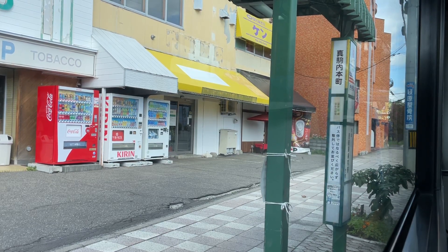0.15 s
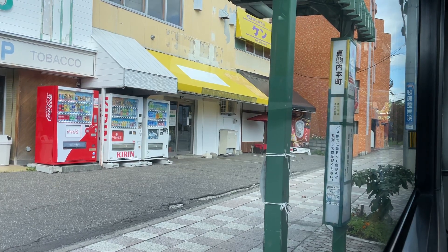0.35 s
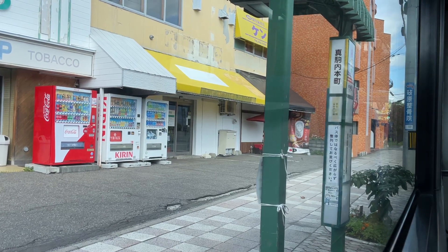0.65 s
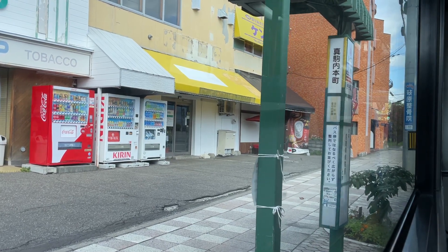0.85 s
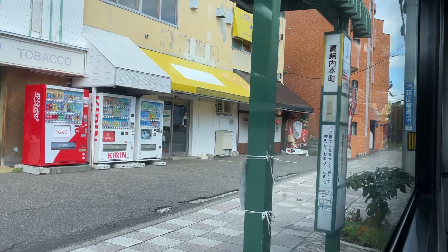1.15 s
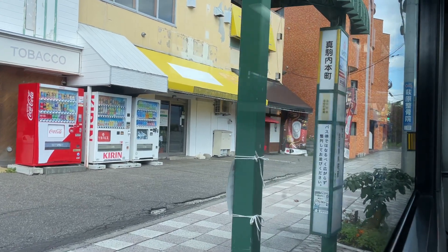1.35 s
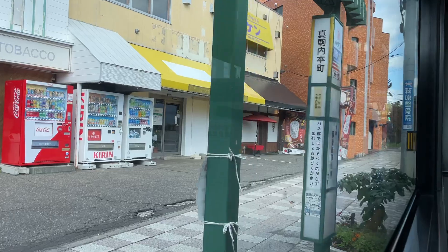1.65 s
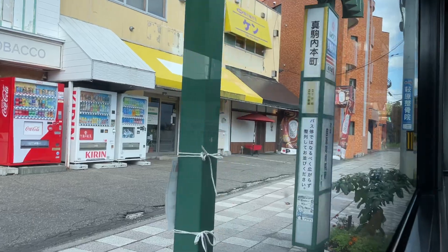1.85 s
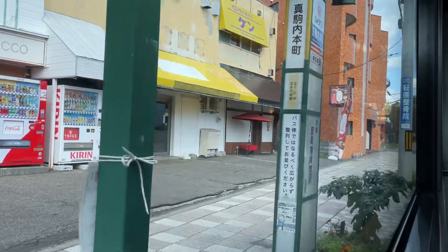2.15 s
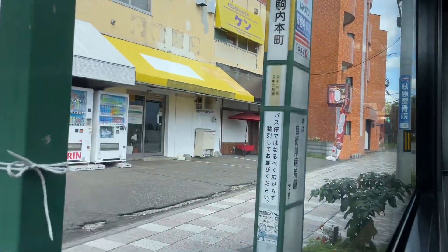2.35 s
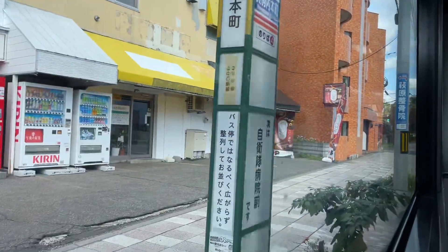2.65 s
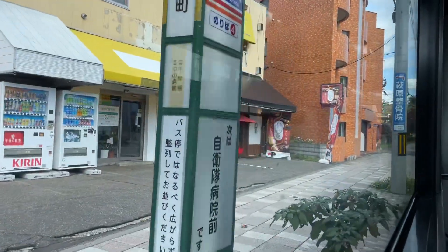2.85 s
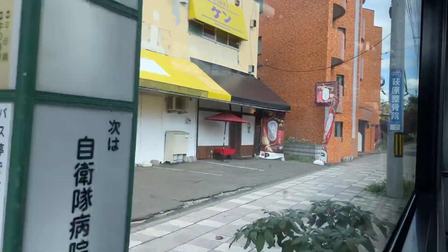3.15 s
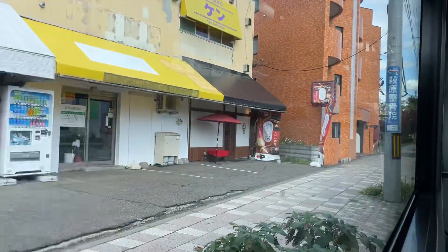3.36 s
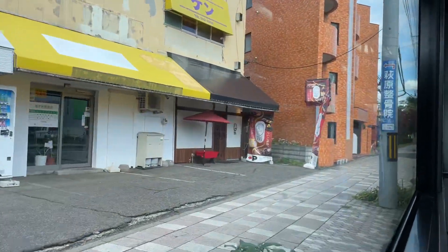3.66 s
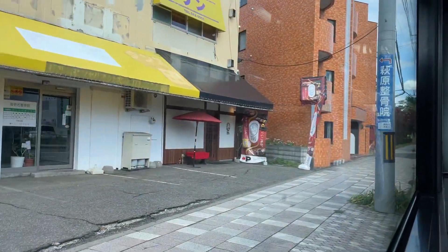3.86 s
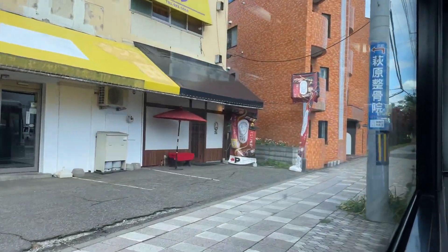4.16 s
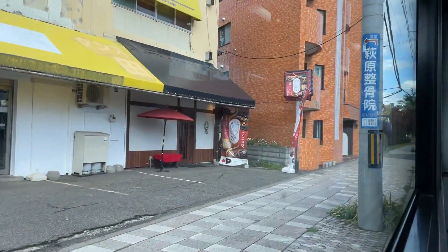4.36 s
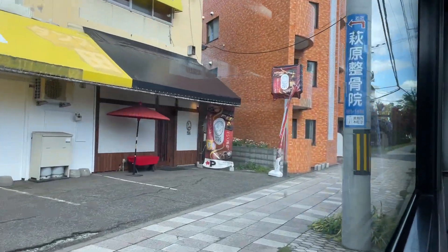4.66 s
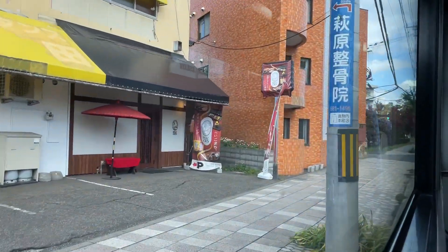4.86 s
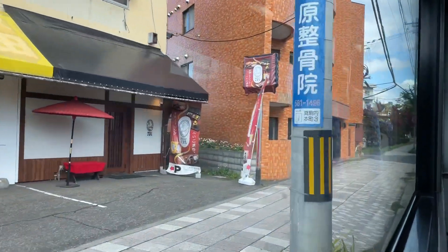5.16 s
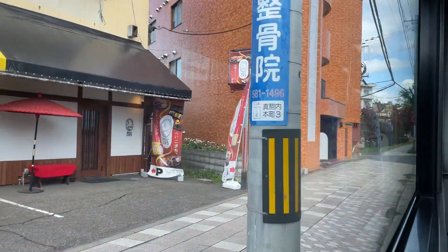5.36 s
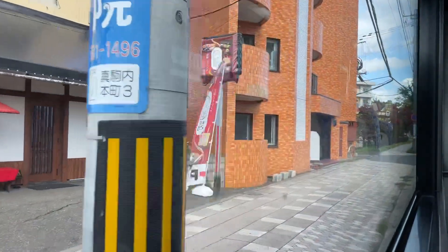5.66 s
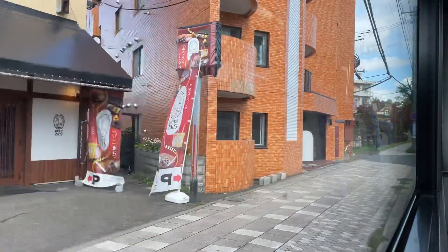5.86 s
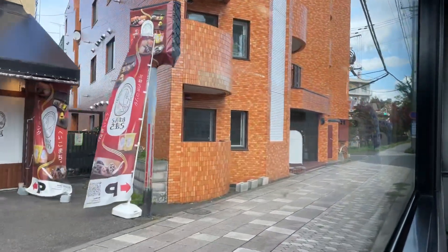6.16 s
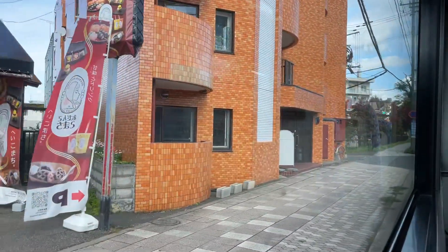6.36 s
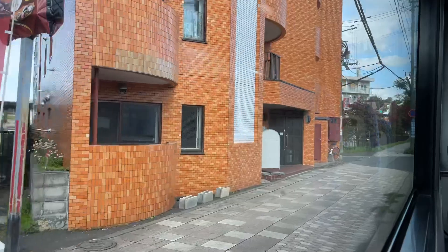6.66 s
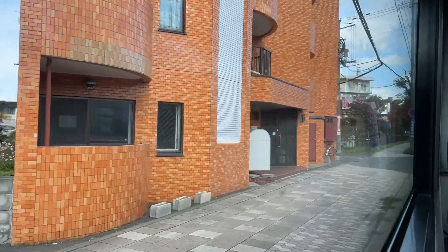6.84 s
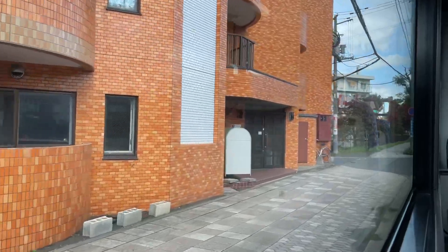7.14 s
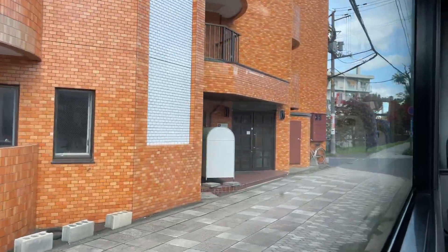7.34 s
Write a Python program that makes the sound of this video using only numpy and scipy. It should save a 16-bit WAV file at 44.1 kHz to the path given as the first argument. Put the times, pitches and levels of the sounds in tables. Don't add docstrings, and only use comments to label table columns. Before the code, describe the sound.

Inside a city bus, a diesel engine sinks to a rumbling idle, then pulls away and revs up hard before dropping for a gear change.

```python
import sys
import numpy as np
from scipy import signal
from scipy.fft import rfft, irfft
from scipy.io import wavfile
from scipy.ndimage import uniform_filter1d, map_coordinates

SR = 44100
rng = np.random.default_rng(int(sys.argv[2]) if len(sys.argv) > 2 else 0)


def gain_from_db(level_db):
    decades = np.asarray(level_db, float) / 20
    return 10 ** decades


def inscribe(sig):
    pcm = np.round(np.clip(np.atleast_2d(sig).T, -1, 1) * 32767)
    wavfile.write(sys.argv[1], SR, pcm.astype(np.int16))


N = 330750
TONE_DECIMATION = 8


def evened(x):
    return x / np.sqrt(np.mean(x ** 2) + 1e-20)


def read_spectrum(points, hz, column=1):
    table = np.transpose(points)
    return np.interp(np.log(hz + 1), np.log(table[0] + 1), table[column])


def curves(rows, t):
    s, *columns = np.transpose(rows)
    return [np.interp(t, s, column) for column in columns]


def drift(t, rate_hz):
    return map_coordinates(rng.standard_normal(400), [t * rate_hz], order=3, mode="wrap")


def peaks_db(rows, hz):
    return sum(db / (1 + (2 * (hz - centre_hz) / width_hz) ** 2) for centre_hz, width_hz, db in rows)


def resonate(x, hz, width_hz):
    turn = np.exp(2j * np.pi * hz * np.arange(len(x)) / SR)
    r = np.exp(-np.pi * width_hz / SR)
    return 2 * (turn * signal.lfilter([1 - r], [1, -r], x / turn)).real


def add(mix, start_s, sound):
    part = mix[round(start_s * SR):][:len(sound)]
    part += sound[:len(part)]


# time_s, firing_hz, load_db
ENGINE = [(0, 46.26, -33), (.4, 37.7, -37), (.8, 27.8, -36.5), (1.2, 25.05, -37.5), (1.7, 27, -36),
          (2.2, 36.09, -35.5), (3, 52.44, -33.5), (4.2, 78.96, -31), (4.7, 90.32, -25.5),
          (5.2, 99.24, -25.5), (5.45, 103.3, -25), (5.65, 105.4, -26.5), (5.95, 100.4, -29),
          (6.45, 92.62, -30.5), (6.7, 86.3, -33.5), (6.95, 77.95, -33.5), (7.2, 67.7, -32.5),
          (7.5, 58.66, -33.5)]
# pulling_db, coasting_db
UNEVEN_DB = [(-5, -9.5), (-1.5, -0.5), (-2.5, -6), (4, 2), (-42, -45), (-3, 4), (-12, 1.5), (-39.5, -43.5),
             (-3, 0), (0.5, 5.5), (-40.5, -38.5), (-2.5, -19), (-4, 4.5), (-5, -4.5), (-3.5, -2.5),
             (-6.5, -15), (-8, -8.5), (-5.5, -10), (-17.5, -6), (-3.5, -3.5), (-3.5, -5), (-9, -7),
             (-16.5, -4.5), (-12.5, -12.5), (-6, -16), (-6, -9.5), (-4, -6.5)]
# frequency_hz, level_db
CABIN = [(30, -12.5), (55, -2.5), (80, 2.5), (160, 1), (270, -4), (380, -1.5), (490, -7), (600, -5)]
# cycle_multiple, pulling_db, coasting_db, slope_db per octave of engine speed
BOOMS = [
    (6, -33, -42, -2),
    (9, -36, -33.5, 10),
    (12, -38, -39, 5),
]
# centre_hz, width_hz, level_db
BODY_MODES = [(35, 7, 11), (43, 5, -9), (53, 9, 18), (67, 4, 13), (78, 8, 19), (88, 6, -5), (98, 8, 14),
              (106, 5, -8), (116, 10, 15), (128, 7, 13), (140, 7, -5), (153, 20, 10.5), (170, 8, 3),
              (210, 14, 10)]
PULL_S, LIFT_S = 1.64, 5.85
BOOM_PER_LOAD = .5


def engine(t):
    firing_hz, load_db = curves(ENGINE, t)
    cycle_hz = firing_hz / 6
    cycle = np.cumsum(firing_hz * (1 + .002 * drift(t, 6))) / 6 * t[1]
    lifted = np.clip((t - LIFT_S) / 0.28, 0, 1)
    idling = np.clip((PULL_S - t) / 0.26, 0, 1)
    out = np.zeros((2, len(t)))
    for order, (pull_db, coast_db) in enumerate(UNEVEN_DB, 2):
        hz = order * cycle_hz
        db = pull_db + lifted * (coast_db - pull_db)
        level = gain_from_db(load_db + db + read_spectrum(CABIN, hz) + 2.8 * drift(t, 4))
        phase = 2 * np.pi * (order * cycle + rng.random() + .02 * drift(t, 4))
        side = np.interp(hz, [290, 380], [.2, .9])
        lag = np.interp(hz, [60, 300], [1.7, .8])
        out += level * [np.sin(phase), side * np.sin(phase - lag)]
    for order, pull_db, coast_db, octave_db in BOOMS:
        hz = order * cycle_hz
        db = pull_db + np.maximum(lifted, idling) * (coast_db - pull_db)
        db = db + BOOM_PER_LOAD * (load_db + 33) + octave_db * np.log2(firing_hz / 70)
        db = db + peaks_db(BODY_MODES, hz)
        phase = 2 * np.pi * (order * cycle + rng.random())
        lag = np.interp(hz, [60, 160], [1.8, 1.1])
        out += np.sqrt(2) * gain_from_db(db - 1.5) * [np.sin(phase), .2 * np.sin(phase - lag)]
    return out


def tone(t, hz, side, waver_db):
    wave = np.sin(2 * np.pi * (np.cumsum(hz) * t[1] + .03 * drift(t, 6)))
    return np.sqrt(2) * gain_from_db(waver_db * drift(t, 8)) * wave * [[1], [side]]


def glide(row, t, side, waver_db):
    start_s, end_s, first_hz, last_hz, db = row
    u = np.clip((t - start_s) / (end_s - start_s), 0, 1)
    swell = (4 * u * (1 - u)) ** .6
    return gain_from_db(db) * swell * tone(t, first_hz + u * (last_hz - first_hz), side, waver_db)


# start_s, end_s, first_hz, last_hz, level_db
WHINES = [(2.25, 2.75, 193, 226, -32), (3.0, 3.65, 246, 301, -29), (3.75, 4.3, 375, 425, -33),
          (4.95, 5.55, 482, 530, -35), (4.7, 5.85, 565, 570, -35), (5.85, 6.75, 405, 383, -30),
          (6.85, 8.0, 330, 364, -26), (6.95, 8.0, 462, 522, -35), (5.2, 5.85, 478, 496, -31),
          (4.3, 5.9, 378, 386, -31), (1.9, 2.45, 250, 300, -37), (1.4, 3.6, 165, 158, -30),
          (6.3, 6.8, 224, 203, -27)]


def whines(t):
    out = np.zeros((2, len(t)))
    for row in WHINES:
        side = np.interp(row[2], [200, 330, 570], [.15, .8, 1.1])
        out += glide(row, t, side, waver_db=1.5)
    return out


# frequency_hz, in_step, quarter_turn_early
LINK = [(40, -.2, .4), (90, 0, .4), (160, .4, .4), (300, .6, .6), (450, 1, .65), (700, .55, .5),
        (1100, 0.56, .2), (1800, .15, -.3), (3000, .15, .2), (5000, .4, 0), (9000, 0.095, 0)]
# centre_hz, width_hz, level_db
RIDGES = [(751, 6.1, 6.5), (1143, 17, 6.5), (1248, 23, 6), (1494, 40, 6.5), (2383, 110, 5.5),
          (3400, 140, 2.5), (5200, 180, 6.5), (10100, 130, 6.5), (11700, 200, -0.5)]


def noise(mid, side, size, patchy_db, level_db):
    hop, hz = size // 4, np.fft.rfftfreq(size, 1 / SR)
    frames = N // hop + 5
    a, b, c, d, patches = rng.standard_normal((frames, len(hz), 5)).T
    patches = uniform_filter1d(patches, size=10, axis=0)
    patches = evened(uniform_filter1d(patches, size=6, axis=1))
    link = (read_spectrum(LINK, hz) + 1j * read_spectrum(LINK, hz, column=2))[:, None]
    link = link / np.maximum(abs(link), .95) * 0.76
    shared, apart = a + 1j * b, c + 1j * d
    z = np.array([shared, link * shared + np.sqrt(1 - abs(link) ** 2) * apart])
    spectra_db = np.array([read_spectrum(mid, hz), read_spectrum(side, hz)])
    colour = gain_from_db(spectra_db + peaks_db(RIDGES, hz))[:, :, None]
    z *= colour / np.sqrt((colour ** 2).sum(1, keepdims=True))
    z *= gain_from_db(patchy_db * patches + level_db(hz[:, None], np.arange(frames) * hop / SR))
    return signal.istft(z, nperseg=size, noverlap=size - hop)[1][:, :N]


# frequency_hz, density_db per Hz
RUMBLE_MID = [(12, -36.5), (20, -23), (53, -4), (89, -1), (130, -9), (161, 2), (188, -7), (279, -13),
              (308, -13.5), (367, -9.5), (484, -20), (523, -24), (908, -27.5), (1150, -30), (2200, -47),
              (2860, -85), (4840, -120)]
RUMBLE_SIDE = [(12, -43.5), (20, -17.5), (48, -3), (106, -4.5), (135, -3.5), (263, -12.5), (382, -3),
               (474, -1), (523, -13.5), (625, -6.5), (908, -23), (982, -16), (1040, -23.5), (1430, -23),
               (2200, -49), (2860, -70.5), (4840, -120)]
# rest_db, load_share in dB per dB, road_db gained at road speed
SHAKING = [
    (-4, -0.03, 5.5),
    (-3, -0.02, 6),
    (-4, 0.32, 10),
    (-2, 0.635, 1.5),
]
# time_s,
# level_db
BUMPS = [(.21, 2.5), (1.29, 7.5), (1.98, 11.5), (3.13, 9), (3.7, 0.5), (4.26, 7), (4.75, 6.5), (5.08, 2.5),
         (5.68, 6.5), (5.9, 2.5), (6.5, 4.5)]
ROLL_S, UP_TO_SPEED_S, BUMP_S = 0.81, 3.18, .16


def rumble():
    def level_db(hz, t):
        load_db = curves(ENGINE, t)[1] + 36
        road = np.clip((t - ROLL_S) / UP_TO_SPEED_S, 0, 1)
        heave, shake, drone, roar = (rest_db + share * load_db + road_db * road
                                     for rest_db, share, road_db in SHAKING)
        heave = heave + sum(db * np.exp(-((t - s) / BUMP_S) ** 2) for s, db in BUMPS)
        low, upper, top = (np.clip((hz - edge_hz) / (.4 * edge_hz), 0, 1) for edge_hz in (75, 260, 600))
        fade = np.clip(1 - (hz - 1400) / 1500, 0, 1)
        body = (1 - low) * heave + low * (1 - upper) * shake
        return body + upper * (1 - top) * drone + top * fade * roar
    sound = noise(RUMBLE_MID, RUMBLE_SIDE, size=2048, patchy_db=1.5, level_db=level_db)
    return gain_from_db(-22) * sound * gain_from_db([[0], [-9]])


# frequency_hz, density_db per Hz
HISS_MID = [(1060, -23.5), (1800, -2), (2090, -8), (2700, -1), (2930, -7.5), (3440, -9.5), (4400, -13),
            (6110, -14), (6760, -25), (7230, -55), (7930, -35), (8780, -27.5), (12700, -27), (14300, -54)]
HISS_SIDE = [(1060, -28), (1800, 3), (2040, -15), (2540, -8.5), (3720, -14), (4740, -19), (5810, -19),
             (6820, -12), (9310, -28), (10500, -59), (11700, -54.5), (12600, -36), (15700, -32.5),
             (16100, -75)]


def through_ports(x, side_db):
    hz = np.fft.rfftfreq(N, 1 / SR)
    open_hz = np.maximum(hz, 3200)
    mid_gain_db = read_spectrum(HISS_MID, open_hz) - read_spectrum(HISS_MID, 3200)
    side_gain_db = read_spectrum(HISS_SIDE, open_hz) - read_spectrum(HISS_SIDE, 3200) + side_db
    tilt_db = 6.26 * np.log2(open_hz / 3200)
    return irfft(rfft(x) * gain_from_db(np.array([mid_gain_db, side_gain_db]) + tilt_db), N)


# start_s, peak_db, ring_hz, ring_width_hz, snap_db
TICKS = [(1.04, -47, 3340, 700, -54.5), (1.283, -39, 3330, 500, -43), (1.8657, -36.5, 1397, 1480, -42),
         (2.012, -48, 3175, 502, -52.5), (2.379, -56.5, 5000, 1500, -54), (2.4136, -34, 1300, 1200, -49.5),
         (2.44, -52, 5000, 1500, -53), (2.529, -29, 4740, 3920, -31.5), (2.526, -30.5, 1180, 1500, -51.5),
         (2.87, -44.5, 3676, 1199, -52.5), (3.2609, -46, 3188, 795, -49.5), (3.8252, -42, 3400, 900, -50.5),
         (4.754, -35, 4000, 3000, -42.5), (4.772, -40.5, 2504, 1500, -54), (5.707, -45, 5000, 1490, -45),
         (6.0882, -35, 3350, 600, -33), (6.375, -57, 5000, 1999, -44)]


def ticks():
    out, t = np.zeros(N), np.arange(6000) / SR
    ring_fade = gain_from_db(-60 * t / .024)
    snap_fade = gain_from_db(-60 * (t / .017) ** 1.8)
    tail = 0.045 * gain_from_db(-60 * t / .15)
    for start_s, db, hz, width_hz, snap_db in TICKS:
        grit = rng.standard_normal((2, len(t)))
        ring = resonate(resonate(grit[0], hz, width_hz), hz, width_hz)
        ring = gain_from_db(db - 2.0) * evened(ring)
        snap = gain_from_db(snap_db + 1.0) * evened(np.diff(grit[1], n=3, prepend=[0, 0, 0]))
        tick = ring * (ring_fade + tail) + snap * (snap_fade + tail)
        add(out, start_s, tick * np.minimum(t / 0.0008, 1))
    return through_ports(out, side_db=-5.0)


# start_s, length_s, level_db, low_share_db, whistle_db
PUFFS = [(0.125, .18, -71, -9, -3.5), (0.623, 0.046, -68.5, -6, -8), (1.401, 0.57, -81, -21.5, 4),
         (1.882, 0.031, -65, -3.5, -9.5), (2.409, 0.042, -64, -1.5, -12), (2.538, 0.026, -63, 1, -6),
         (2.863, 0.093, -72.5, -3.5, -9.5), (3.253, .07, -60, -4.5, -12), (4.311, 0.063, -64, -5.5, -12),
         (4.454, 0.13, -66.5, 4.5, -9.5), (4.74, 0.093, -66, 1.5, -6.5), (4.897, 0.096, -70.5, -9, -5),
         (5.664, .08, -60, -3, -6.5), (5.702, .09, -66, 9, 5.5), (5.89, 0.055, -65, 2, -5.5),
         (6.359, 0.098, -55.5, -5.5, -7), (6.418, 0.091, -72, 8, -8)]


def puffs():
    out = np.zeros(N)
    for start_s, length_s, db, low_db, whistle_db in PUFFS:
        air = rng.standard_normal(20000)[:round(1.5 * length_s * SR)]
        u = np.arange(len(air)) / SR / length_s
        high = evened(np.diff(air, n=2, prepend=[0, 0]))
        low = gain_from_db(low_db) * evened(resonate(air, 4600, 1500) + 1.4 * resonate(air, 2500, 1500))
        whistle = gain_from_db(whistle_db) * evened(resonate(air, 9660, 660))
        swell = (3.5 * u * np.exp(1 - 3.5 * u)) ** 1.1
        add(out, start_s, gain_from_db(db + 10) * (high + low + whistle) * swell)
    return through_ports(out, side_db=-3.0)


# start_s, end_s, first_hz, last_hz, level_db
CREAK = (6.25, 6.5, 2340, 2310, -57)


def creak(t):
    return glide(CREAK, t, side=.2, waver_db=5.0)


# time_s, pitch_hz
FAN = [(0, 960), (2.5, 973), (4.2, 978), (5.5, 972), (6.4, 953), (7.5, 950)]


def fan(t):
    return gain_from_db(-55.5) * tone(t, curves(FAN, t)[0], side=3.0, waver_db=1.5)


def hiss():
    def level_db(hz, t):
        load_db = curves(ENGINE, t)[1] + 36
        return 0.46 * load_db * np.clip(1.2 - hz / 9000, 0, 1)
    sound = noise(HISS_MID, HISS_SIDE, size=1024, patchy_db=1.0, level_db=level_db)
    return sound * gain_from_db([[-54], [-54]])


def scene():
    t = np.arange(0, N, TONE_DECIMATION) / SR
    tones = engine(t) + whines(t) + creak(t) + fan(t)
    tones = signal.resample_poly(tones, TONE_DECIMATION, 1, axis=1)[:, :N]
    mid, side = tones + rumble() + ticks() + puffs() + hiss()
    return np.array([mid + side, mid - side])


def low_pass(x):
    return signal.sosfilt(signal.butter(12, 15800, fs=SR, output="sos"), x)


def record(dry):
    knee, room = .7, .22
    rounded = np.sign(dry) * (knee + room * np.tanh((abs(dry) - knee) / room))
    limited = np.where(abs(dry) > knee, rounded, dry)
    limited *= np.minimum(np.arange(N) / 200, 1)
    return low_pass(limited)


dry = scene()
out = record(dry)
inscribe(out)
```